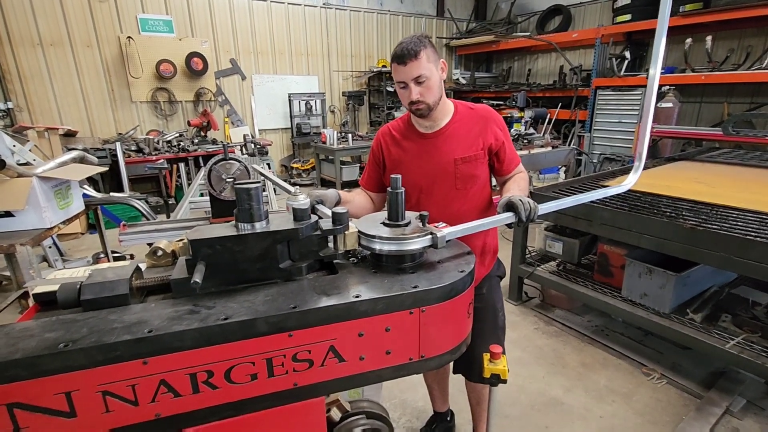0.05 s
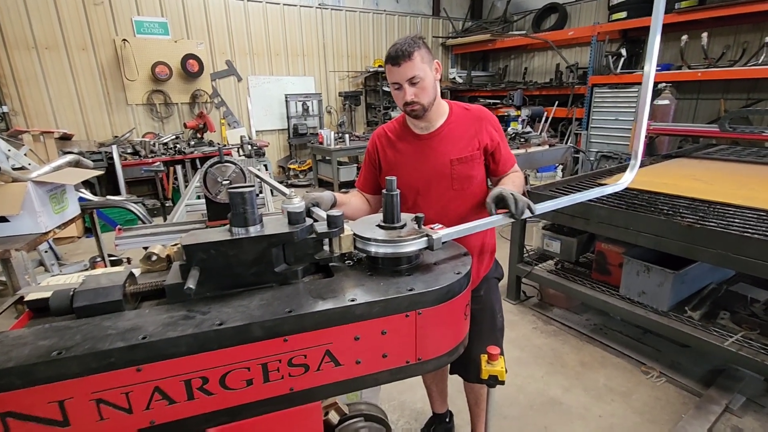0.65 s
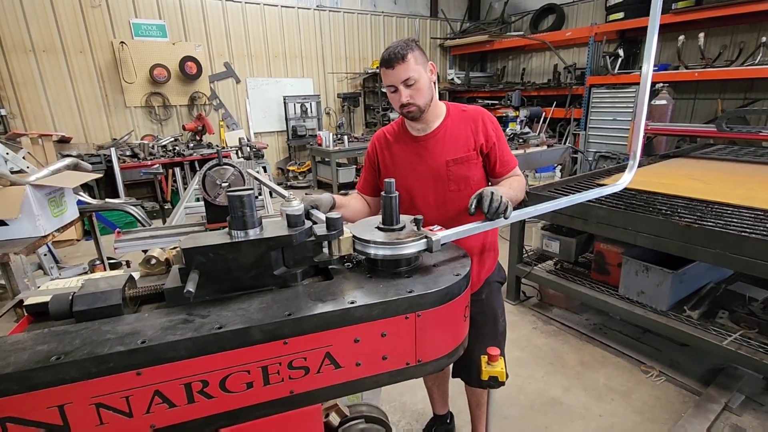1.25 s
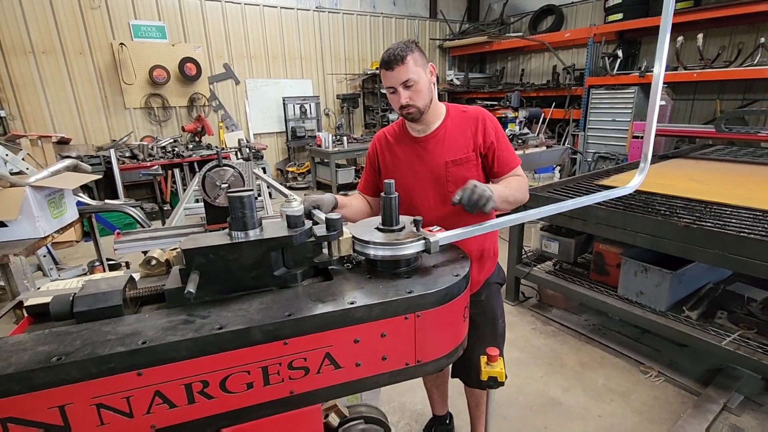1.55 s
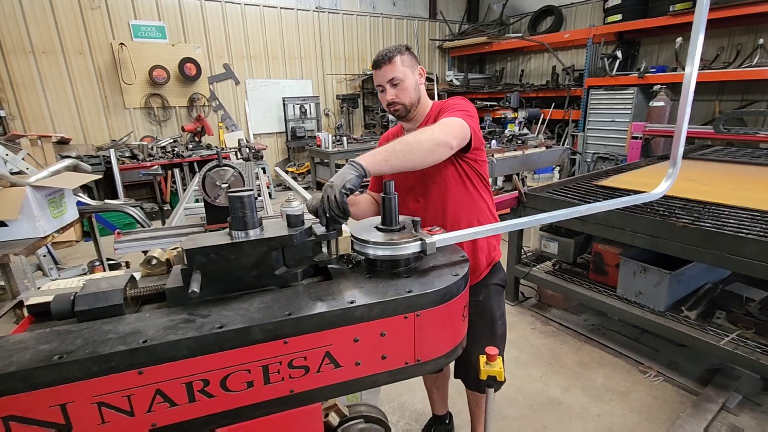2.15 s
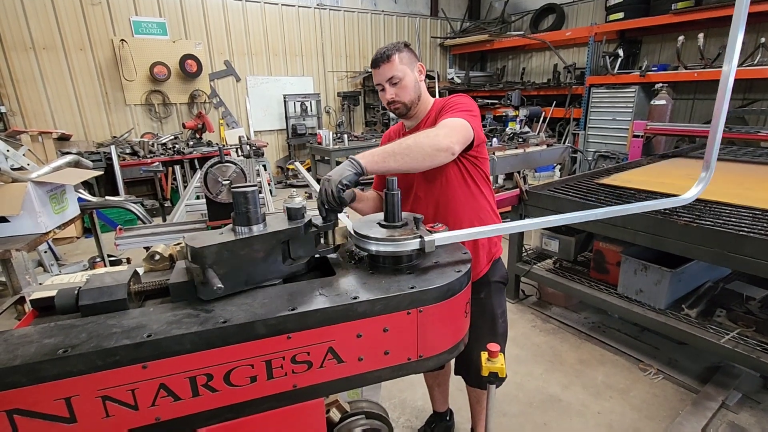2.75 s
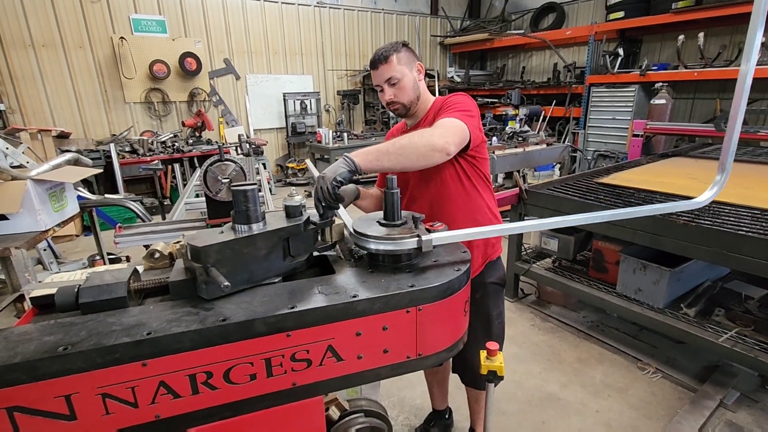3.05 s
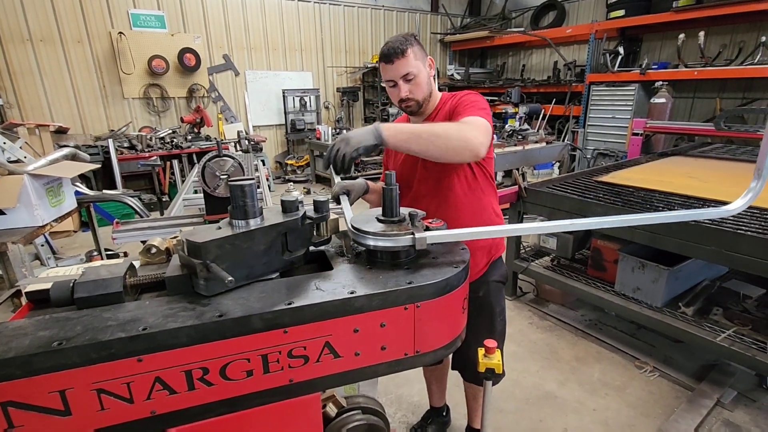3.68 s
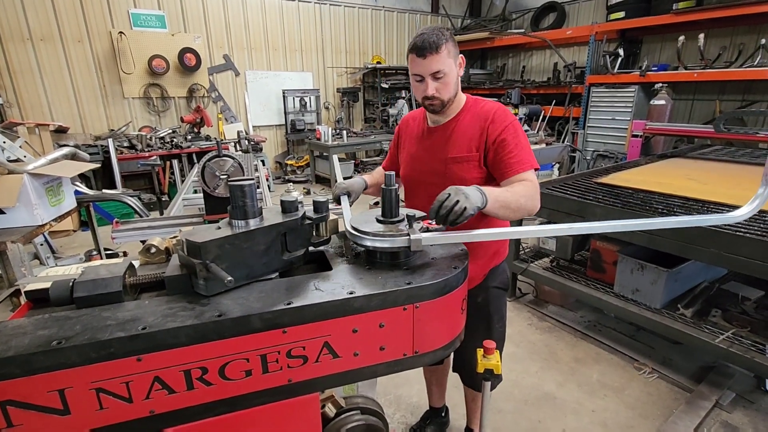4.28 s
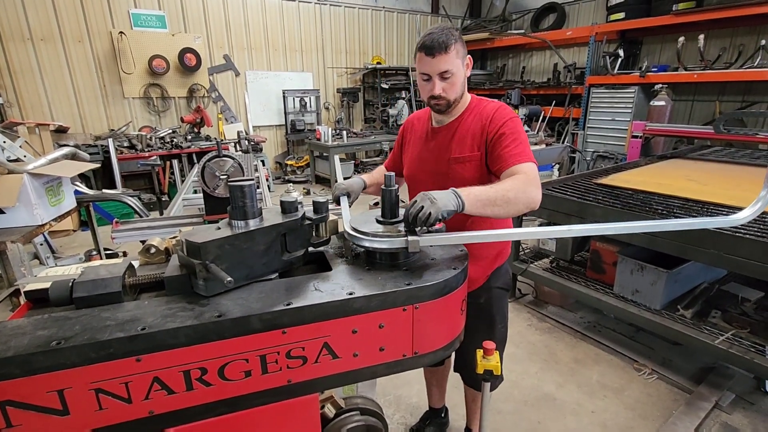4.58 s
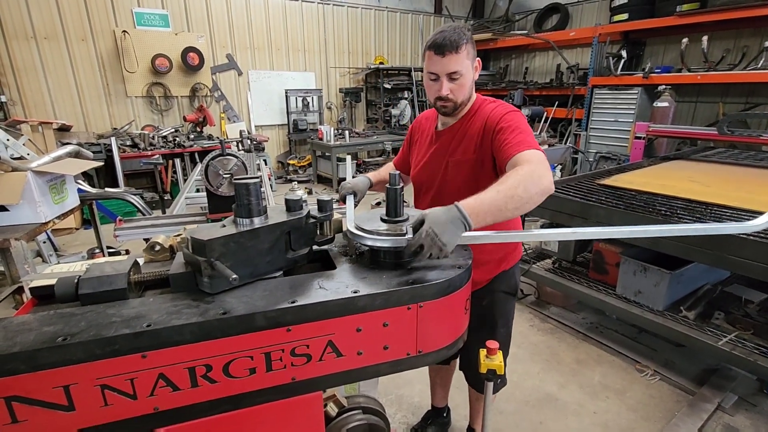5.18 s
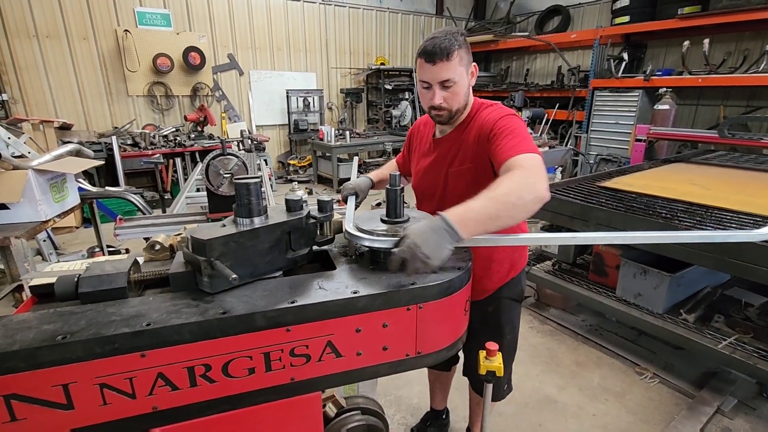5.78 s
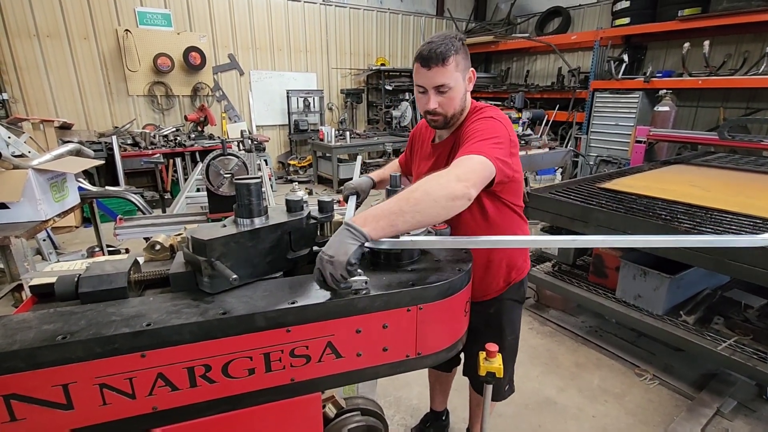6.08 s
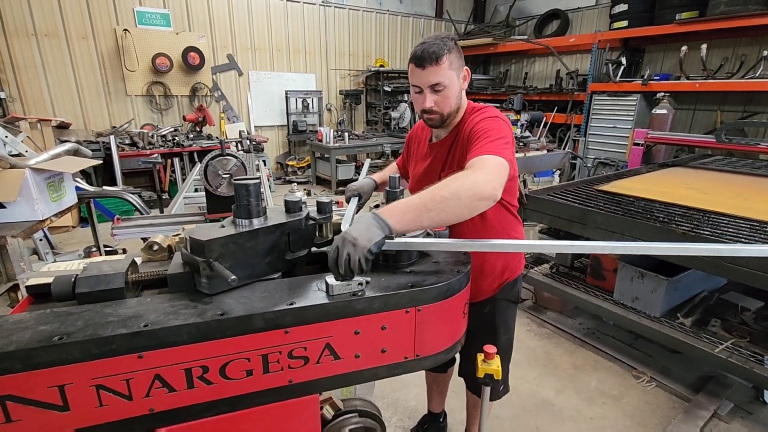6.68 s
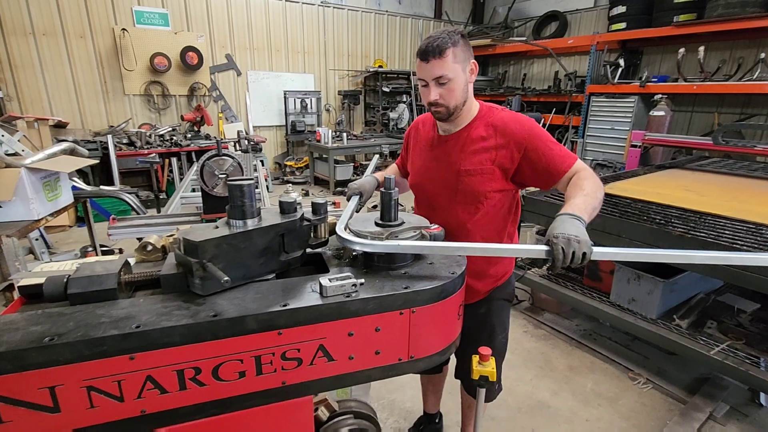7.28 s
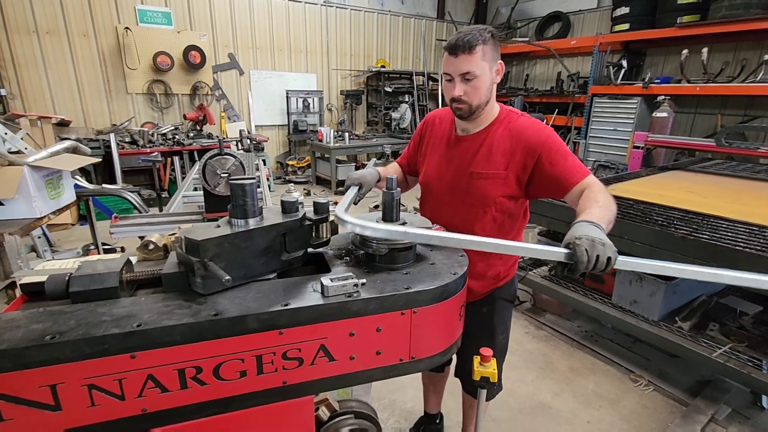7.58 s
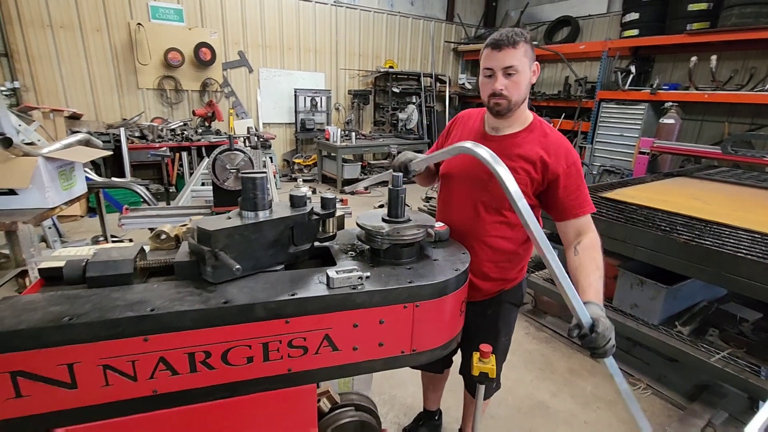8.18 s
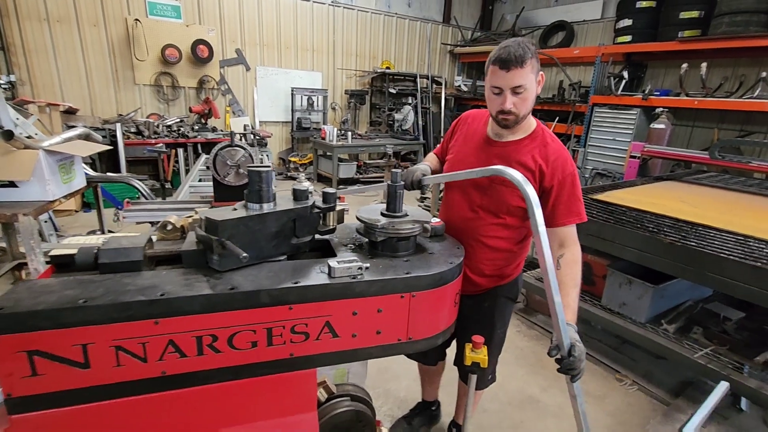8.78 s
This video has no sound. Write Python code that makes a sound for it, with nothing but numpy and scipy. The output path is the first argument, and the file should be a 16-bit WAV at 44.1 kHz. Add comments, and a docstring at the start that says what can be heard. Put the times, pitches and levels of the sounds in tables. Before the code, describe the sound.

A tube bending machine close by gives a brief high whistle and a few dull knocks, pauses, then settles into a lasting electric whine with gear hum and fan rush. Midway come light steel clinks and a short sliding hiss, followed by a loud, bright clank as a block is set on the metal table. A tube snaps loose just after. Ventilation rumbles throughout in the slightly reverberant workshop.

```python
"""An electric tube bender in a workshop, over the rumble of ventilation. First its inverter-fed motor
creeps with a thin magnetic whistle, stops, then runs up to a lasting whine with gear hum and fan rush;
at each start and stop the gears knock in the frame. A glove lets go of a steel clamp block with a faint
tick; then the block clinks on steel, is slid off the tube with a hiss and is set down on the machine's
steel table, where it rings. Last, the tube snaps free and a glove slides along it as the motor runs."""
import sys
import numpy as np
from scipy import signal
from scipy.fft import rfft, irfft, next_fast_len
from scipy.io import wavfile

SR = 44100
rng = np.random.default_rng(int(sys.argv[2]) if len(sys.argv) > 2 else 0)


def transcribe(signal):
    """Save signal, clipped to [-1, 1], as a 16-bit WAV file at the path in sys.argv[1]."""
    frames = np.atleast_2d(signal).T
    limited = np.clip(frames, -1, 1)
    pcm = np.round(limited * 32767).astype(np.int16)
    wavfile.write(sys.argv[1], SR, pcm)


N = 398663
T = np.arange(N) / SR
CARRIER_HZ, SUPPLY_HZ = 3001.2, 70.0  # the inverter's switching; its output at full speed

# noise of ventilation, fan and bearings, knocked frame, fed windings and sliding steel:
# (frequency [Hz], spectral density [dB])
VENTILATION_SPECTRUM = [(20, -73), (38, -55.5), (58, -51), (76, -59), (98, -53.5), (125, -66), (250, -76.5),
                        (450, -74), (850, -71), (1200, -76), (2200, -84), (3500, -94.5), (7500, -97.5),
                        (15000, -112)]
FAN_SPECTRUM = [(200, -81.5), (400, -73.5), (750, -88.5), (1150, -81.5), (1450, -86), (1800, -91),
                (2150, -81.5), (2500, -85.5), (3300, -85.5), (5100, -90), (6300, -85), (8000, -93.5),
                (10000, -100), (11600, -102), (12700, -96), (15000, -99.5)]
FRAME_SPECTRUM = [(150, -68), (250, -67), (350, -53.5), (450, -49), (620, -64.5), (800, -62), (1000, -56),
                  (1300, -73.5), (1600, -60), (1900, -71.5), (2200, -66.5), (3500, -75), (7500, -75),
                  (14000, -99.5)]
SIZZLE_SPECTRUM = [(2000, -40), (4500, -57), (6500, -46), (8500, -60), (10500, -70), (12500, -50),
                   (15000, -63)]
FRICTION_SPECTRUM = [(1000, -81), (2000, -78), (3300, -73), (5000, -77.5), (7200, -69), (10000, -85.5),
                     (13500, -73.5), (15500, -82.6)]
# motor housing resonances: (frequency [Hz], half width [Hz], added peak [dB])
HOUSING_MODES = [(2590, 24, -2), (3420, 35, -2), (4195, 11.5, 3), (4500, 13, 2), (4856, 19, 8),
                 (6440, 27, -1), (7120, 25, 1), (7570, 64, 11.5), (8300, 28, 11)]
# gears take up their play: (time [s], level [dB], tilt [dB/octave])
GEAR_KNOCKS = [(.053, 0, 1), (0.096, -2.5, -8), (.131, 0.5, -1), (.62, 3.5, -6), (.666, -9.5, -9),
               (1.343, 1.5, 0.5), (1.377, 4.5, 0), (1.405, -4.5, 2.5), (1.427, 2, -4), (1.645, -7, -2)]
# gearbox tones at full speed: (frequency [Hz], level [dB], roughness [0-1], left lag [rad])
GEAR_TONES = [(261.2, -63, 0.96, 1), (317.5, -58.5, 0.8, 0.5), (382, -60.5, .5, -2.5), (420, -55, 0.77, 0),
              (451.9, -50, 0.24, 0.43), (481.7, -54, 0.96, 0.05), (974.4, -60.5, 0.1, 2.5),
              (1297, -50, 0.95, 3), (1370, -59, 0.7, 3.5), (1440, -53, 0.84, 2.5)]
# the motor's own hum: (supply multiple, level [dB], left lag [rad])
MOTOR_HARMONICS = [(9, -54.5, 1.27), (10, -45.5, 1.5)]
# clusters of weak sidebands: (carrier multiple, level [dB])
BUZZ_BANDS = [(1, -75), (2, -61), (4, -59.5), (5, -67)]
# current fed to creep, brake and restart:
# (time [s], length [s], level of even carrier multiples [dB], level of odd ones [dB])
CURRENT_FEEDS = [(0.012, 0.063, -38.5, -41), (0.075, 0.356, -37.5, -44), (0.399, 0.058, -39, -62),
                 (1.302, 0.1, -36, -40.5)]
# whistle of a feed:
# (carrier multiple, level [dB], left minus right [dB], roughness [0-1], flutter [1/s], left lag [rad])
WHISTLE_TONES = [(2, 6.5, 6.5, 0.42, 83, 1.63), (3, -1, 4, .9, 120, 0.84), (4, -1.5, -5, 0.6, 130, 1.85),
                 (5, -4, 3, 0.9, 130, 1.2)]
# magnetic tones at full speed: (carrier multiple, supply multiple, level [dB], left minus right [dB])
WHINE_TONES = [(1, -3, -61, 2), (1, -1, -66, 5), (1, 1, -68, 1), (1, 3, -57.5, 3), (1, 5, -66, 8),
               (2, -10, -61.5, 7), (2, -4, -60.5, 4), (2, -2, -55, 7), (2, 0, -64, 4), (2, 2, -55.5, 5),
               (2, 4, -52, 0), (2, 5, -61, 7), (2, 6, -63.5, 9), (2, 8, -47.5, 8), (2, 10, -64.5, 1),
               (2, 18, -67.5, 7), (3, -21, -64, 4), (3, -19, -69, -7), (3, -9, -62, -4), (3, -7, -63.5, 6),
               (3, -3, -69, -1), (4, -6, -71, -1), (4, 0, -66, -11), (4, 6, -69, -12), (4, 8, -70, -13),
               (5, -11, -73, -10)]
# drift of strong whine tones near each named frequency as the worker moves: (time [s], level [dB])
DRIFT_3200 = [(1.5, 0), (2.2, -3), (2.7, -1.5), (4.9, -5), (6.5, -2), (8.1, -1.5), (8.5, 6.5), (8.82, 10.5),
              (9.03, 7.5)]
DRIFT_5800 = [(1.5, -1), (2.6, -6), (3.5, 2), (5, 2.5), (6.8, 2.5), (8.2, 5.5), (9.03, 2)]
DRIFT_6280 = [(1.5, -5), (2, -10), (2.5, -.5), (3.1, -5), (3.5, 1), (4.2, 1), (4.55, -3), (5, 2.5),
              (6.8, -7), (7.3, 0), (7.8, 1), (8.35, -8), (9, 8)]
DRIFT_6560 = [(1.5, -6), (2, -4), (2.9, -3.5), (3.8, -6), (5.5, -4), (6.8, -3.5), (7.7, -5), (8.2, -3),
              (8.55, -10), (8.8, -10), (9.03, 2)]
# the block, then a glove, slides on the tube: (time [s], length [s], level [dB])
SLIDE_STROKES = [(5.546, 0.21, 0.5), (7.43, 0.047, -11.5)]
# the tube snaps free: (time [s], level [dB], t60 [s])
TUBE_SNAPS = [(6.9035, -15, .013), (6.921, -33, .025)]
# dense, short-lived modes of the tube and of the steel table: (frequency [Hz], relative level [dB])
TUBE_SPECTRUM = [(500, -33), (1600, -8), (2300, -4), (3200, 3), (4200, -3), (5500, -11), (10000, -27),
                 (14000, -17), (16000, -25)]
TABLE_SPECTRUM = [(300, -36), (900, -10), (1600, -16), (2600, 2), (3260, 5), (3700, 1), (4220, 9),
                  (4750, -1), (5350, 5), (6300, -3), (7300, -2), (8800, 3), (10400, -11), (12200, -5),
                  (14000, 1), (15000, -3), (16000, -17)]
# modes of the clamp block: (frequency [Hz], level [dB], t60 [s], left minus right [dB],
# left lag [rad], change when struck on an edge [dB])
BLOCK_MODES = [(1784, -26, 1.6, -2, .8, 0), (3870, -8.5, .25, 0, 1.7, -1), (4120, -4.5, .21, -1, 2.3, -7),
               (7752, -18, .36, 3, 2.1, 13), (8834, 0, .21, 4, 1.4, -14), (9195, -15, .17, 3, 1.9, 17),
               (11353, -14, .38, 1, 1.4, 6), (14078, -5, .23, -4, .6, -14)]
# a glove lets go of the block with a faint tick (first row); then the block clinks on steel:
# (time [s], ring level [dB], hardness as tilt [dB/octave], free ringing [s],
# change of lowest bending mode [dB], crack level [dB], crack t60 [s], edge share [0-1])
BLOCK_IMPULSES = [(3.74, -60, -10, .01, -12, -38, .06, 0), (4.775, -35, -11, 0.062, -17, -54, .03, .4),
                  (4.822, -37.5, -16, 0.0095, 2, -44, .05, .4),
                  (4.829, -37, -10, 0.011, -6, -37, 0.048, .5),
                  (4.835, -26, -8.5, 0.017, -22, -32, 0.071, 1), (4.862, -43, -10, .015, -17, -46, .03, .7),
                  (6.139, -17.5, -13.5, 0.158, -6.5, -35, 0.043, 0.7),
                  (6.17, -33.5, -2, 0.054, -3, -33, 0.044, 0.07), (6.295, -12, 0, .5, -22, -11.5, .035, 0),
                  (6.3, -30, 0, .03, -10, -17, .04, 0), (6.305, -32, -4, .03, -10, -24, .15, 0),
                  (6.646, -34, -6.5, 0.025, -10, -55, .02, 0), (6.814, -55, 11, .01, 0, -17, 0.014, 0),
                  (6.856, -31, -13, .04, 4, -34, .03, 0),
                  (6.861, -23, -10.5, 0.0069, -7, -23.5, 0.027, 0.16)]


def undb(db):
    """Amplitude ratio of a level in decibels."""
    return 10 ** (np.asarray(db) / 20)


def panned(db):
    """Constant-power gains for a left minus right level difference."""
    gains = undb(np.array([np.atleast_1d(db), -np.atleast_1d(db)]) / 2)
    return gains / np.sqrt(np.mean(gains ** 2, axis=0))


def path_phase(hz, lag_samples=20):
    """Path difference: sound from the right arrives late on the left, by this phase in radians."""
    return 2 * np.pi * hz * lag_samples / SR


def walk(rate):
    """Band-limited random fluctuation: about rate changes a second, spread near 1."""
    knots = rng.standard_normal(int(N / SR * rate) + 3)
    fine = signal.resample(knots, 8 * len(knots))
    return np.interp(T * rate * 8, np.arange(len(fine)), fine)


def envelope(start, attack, length, t60):
    """Linear rise, held until length has passed, then exponential decay."""
    age = T - start
    return np.clip(age / attack, 0, 1) * undb(-60 * np.clip((age - length) / t60, 0, 3))


def add(out, start, sound):
    """Superposition: a sound joins the mix at its start time."""
    i = int(start * SR)
    out[:, i:i + sound.shape[1]] += sound[:, :N - i]


def noise(spectrum, direct, size=N, tilt_db=0, peaks=()):
    """Direct plus diffuse noise field; long waves are coherent between left and right."""
    n = next_fast_len(size, True)
    hz = np.maximum(np.arange(n // 2 + 1) * SR / n, 1)
    source, mid, side = rfft(rng.standard_normal((3, n)))
    coherence = .99 / (1 + (hz / 640) ** 4)
    direct = direct * (1 - coherence)
    near = source * np.array([np.exp(-1j * path_phase(hz)), np.ones(len(hz))])
    diffuse = mid * np.sqrt((1 + coherence) / 2) + side * np.sqrt((1 - coherence) / 2) * [[1], [-1]]
    field = np.sqrt(direct) * near + np.sqrt(1 - direct) * diffuse
    knot_hz, knot_db = np.transpose(spectrum)
    gain = undb(np.interp(np.log(hz), np.log(knot_hz), knot_db))
    gain *= undb(tilt_db * np.log2(np.maximum(hz, 200) / 450))
    gain *= hz ** 2 / (hz ** 2 + 150)  # rolls off below about 12 Hz
    gain *= 1 + sum(undb(db) / (1 + ((hz - centre) / width) ** 2) for centre, width, db in peaks)
    return irfft(field * gain, n)[:, :size] * np.sqrt(SR / 2)


def tone(turns, rough, rate, lag, drift_db=0):
    """Random modulation: a steady sinusoid plus a rough share of narrow-band noise, rms near 1."""
    angle = 2 * np.pi * (turns % 1 + rng.random())
    amplitude = np.sqrt(2 * (1 - rough ** 2)) + rough * (walk(rate) + 1j * walk(rate))
    phasor = amplitude * np.exp(1j * angle)
    pair = np.array([(phasor * np.exp(-1j * lag)).real, phasor.real])
    return pair * undb(drift_db * np.array([walk(1.775), walk(2.03)])) if drift_db else pair


def room(dry, wet_db, low_t60=.39, treble_t60=.43):
    """Reverberation: the workshop's reflections add a diffuse, exponentially decaying tail."""
    t = T[:SR]
    hiss = rng.standard_normal((2, SR))
    low = signal.sosfilt(signal.butter(2, 2500, fs=SR, output="sos"), hiss)
    tail = (low * undb(-60 * t / low_t60) + (hiss - low) * undb(-60 * t / treble_t60)) * (t > .005)
    tail /= np.sqrt(np.sum(tail ** 2, axis=1, keepdims=True))
    return dry + undb(wet_db) * signal.fftconvolve(dry, tail, axes=1)[:, :N]


def ventilation():
    """Broadband flow noise, strongest in the bass, rumbles and swells slightly."""
    swell = undb(.7 * walk(5))
    return noise(VENTILATION_SPECTRUM, direct=.43) * swell * panned(1)


def fan(speed):
    """Resonance: the rush of fan and bearings excites narrow modes of the motor housing."""
    rush = noise(FAN_SPECTRUM, direct=.082, peaks=HOUSING_MODES)
    return rush * undb(.5 * walk(2.79)) * panned(2.1) * speed


def gear_knocks(rise_s=.0047, t60=.16):
    """Backlash: gear teeth meet and rattle the heavy frame in short, dull bursts."""
    out, t = np.zeros((2, N)), T[:SR // 2]
    burst = np.minimum(t / rise_s, 1) * undb(-60 * t / t60)
    for start, db, tilt_db in GEAR_KNOCKS:
        rattle = noise(FRAME_SPECTRUM, direct=.42, size=len(t), tilt_db=tilt_db)
        add(out, start, rattle * undb(db) * burst)
    return room(out * panned(2.9), wet_db=-1.5)


def loosening(length):
    """Envelope of the hum's change of timbre as the clamp is loosened."""
    return envelope(2.32, attack=.57, length=length, t60=8.6)


def gear_hum(speed, run_s, rasp_hz=2116, shaft_hz=32.2):
    """Modulation: mesh tones flutter with the load, and a rasp once a shaft turn makes sidebands."""
    upper_lift_db = 7.5 * loosening(length=.43)
    out = 0
    for hz, db, rough, lag in GEAR_TONES:
        gain = undb(db + .5 + (upper_lift_db if hz > 1100 else 0))
        out += gain * tone(hz * run_s, rough, rate=hz / 32, lag=lag)
    for k in range(-2, 3):
        rasp = tone((rasp_hz + k * shaft_hz) * run_s, rough=.69, rate=9, lag=1.5)
        out += undb(-59.5 - 3.5 * abs(k)) * rasp
    return out * speed * panned(1.5)


def motor_hum(speed, run_s, growth_db_per_s=.1):
    """Forced vibration at supply harmonics grows slowly and sinks for a while as the clamp loosens."""
    hum = sum(undb(db) * tone(round(k) * SUPPLY_HZ * run_s, rough=.18, rate=13, lag=lag)
              for k, db, lag in MOTOR_HARMONICS)
    level_db = 1.5 + growth_db_per_s * run_s - 4 * loosening(length=2)
    return hum * speed * undb(level_db) * panned(-.67)


def inverter_buzz(speed, run_s, sidebands=21, size=1024):
    """Periodic modulation: a pattern repeats each supply cycle, so weak sidebands flank the carriers."""
    out, orders = np.zeros((2, N)), np.arange(-sidebands, sidebands + 1)
    place = (SUPPLY_HZ * run_s % 1 * size).astype(int)
    harmonics = np.exp(2j * np.pi * np.outer(orders, np.arange(size)) / size)
    for multiple, db in BUZZ_BANDS:
        # odd carrier multiples carry mostly odd sidebands, even ones even
        parity = np.where((orders + round(multiple)) % 2, .35, 1)
        weight = parity * (rng.standard_normal((2, len(orders), 2)) @ [1, 1j])
        cycle = (weight / (1 + (orders / 11) ** 2)) @ harmonics  # the outer ones are weaker
        carrier = np.exp(2j * np.pi * round(multiple) * CARRIER_HZ * T)
        out += undb(db) * (cycle[:, place] / cycle.real.std() * carrier).real
    return out * speed ** 2


def creep_whistle(attack_s=.05, t60=.11, odd_delay_s=.02, sag_db_per_s=26):
    """Beating: at a crawl, sidebands crowd the carrier multiples; the current sags after each surge."""
    even, odd, whistle = 0, 0, 0
    for start, length, even_db, odd_db in CURRENT_FEEDS:
        sag_db = -sag_db_per_s * np.clip(T - start, 0, length)
        even += envelope(start, attack_s, length, t60) * undb(even_db + sag_db)
        odd += envelope(start + odd_delay_s, attack_s, length - odd_delay_s, t60) * undb(odd_db + sag_db)
    for multiple, db, pan_db, rough, rate, lag in WHISTLE_TONES:
        feed = odd if round(multiple) % 2 else even
        partial = tone(round(multiple) * CARRIER_HZ * T, rough, rate, lag)
        whistle += feed * undb(db) * panned(pan_db) * partial
    sizzle = noise(SIZZLE_SPECTRUM, direct=.18) * even
    return room(whistle + sizzle, wet_db=-8.5)


def creep_whirr(hz=812):
    """Narrow-band noise: the gears whirr softly while the shaft crawls."""
    crawl = envelope(.055, attack=.073, length=.61, t60=.99)
    return undb(-44.5) * crawl * tone(hz * T, rough=1, rate=51, lag=1.94)


def motor_whine(speed, run_s, throb_hz=5.2):
    """Magnetic forces shake the stator at carrier multiples plus and minus multiples of the supply."""
    throb_db = 2 * np.sin(2 * np.pi * throb_hz * run_s)  # rotor slip modulates the inner sidebands
    # standing waves shift as the worker moves
    low, under, middle, top = (np.interp(T, *np.transpose(curve))
                               for curve in (DRIFT_3200, DRIFT_5800, DRIFT_6280, DRIFT_6560))
    drift_db = {(1, 3): low, (2, -4): under, (2, -2): under + throb_db,
                (2, 2): top + throb_db, (2, 4): middle, (2, 8): top}
    out = np.zeros((2, N))
    for carrier, supply, db, pan_db in WHINE_TONES:
        carrier, supply = round(carrier), round(supply)
        turns = carrier * CARRIER_HZ * T + supply * SUPPLY_HZ * run_s
        lag = path_phase(carrier * CARRIER_HZ + supply * SUPPLY_HZ) if carrier > 1 else 2.0
        rough = .2 if (carrier, supply) in drift_db else .33  # the weak tones waver most
        sideband = tone(turns, rough, rate=11, lag=lag, drift_db=.49)
        out += sideband * undb(db + drift_db.get((carrier, supply), 0)) * panned(pan_db)
    return out * speed ** 2


def sliding():
    """Friction: rubbing on the tube makes a grainy hiss that grows as each stroke gathers speed."""
    strokes = sum(undb(db) * envelope(start, length, length, t60=.29)
                  for start, length, db in SLIDE_STROKES)
    return noise(FRICTION_SPECTRUM, direct=.13) * strokes * undb(1.8 * walk(160))


def tube_snaps():
    """Impulsive excitation: the tube snaps out of the forming die with quickly damped clacks."""
    out, t = np.zeros((2, N)), T[:SR // 8]
    for start, db, t60 in TUBE_SNAPS:
        clack = noise(TUBE_SPECTRUM, direct=.49, size=len(t))
        add(out, start, clack / clack.std() * undb(db - 60 * t / t60))
    return room(out, wet_db=-9)


def block_ring(t, tilt_db, free_s, bend_db, edge, twin_db=-19, twin_split=.005):
    """Modal vibration: each mode of the block beats with a faint, slightly higher, longer-lived twin."""
    ring, knots = 0, np.linspace(0, t[-1], 90)
    detune = .006 * np.exp(-free_s / .06)  # a firm grip pulls the modes off pitch
    for k, (hz, db, t60, pan_db, lag, edge_db) in enumerate(BLOCK_MODES):
        db += edge_db * edge + tilt_db * np.log2(hz / 4000)  # hard contacts are brighter
        db += bend_db * (k == 0)  # lying flat, the block can hardly bend
        chatter_db = 1.7 * np.interp(t, knots, rng.standard_normal(len(knots)))
        beat = np.exp(2j * np.pi * (twin_split * hz * t + rng.random()))
        twin = undb(twin_db - 60 * t / (3.2 * t60)) * beat
        phasor = np.exp(2j * np.pi * hz * (1 + detune * rng.standard_normal()) * t)
        mode = undb(db + chatter_db) * (undb(-60 * t / t60) + twin) * phasor
        ring += panned(pan_db) * np.array([mode * np.exp(-1j * lag), mode]).imag
    return np.sqrt(2) * ring


def clamp_block(onset_s=.00093, damping_s=.022):
    """Impulse response: the block ticks as a glove lets go, then cracks and rings on steel till damped."""
    out, t = np.zeros((2, N)), T[:SR * 3 // 4]
    for start, ring_db, tilt_db, free_s, bend_db, crack_db, crack_t60, edge in BLOCK_IMPULSES:
        onset = np.minimum(t / onset_s, 1)
        damping = np.exp(-np.maximum(t - free_s, 0) / damping_s)  # by the glove or the table
        ring = block_ring(t, tilt_db, free_s, bend_db, edge) * undb(ring_db) * onset * damping
        crack = noise(TABLE_SPECTRUM, direct=.11, size=len(t), tilt_db=.72 * tilt_db)
        crack *= undb(crack_db - 60 * t / crack_t60) / crack.std()
        add(out, start, ring + crack)
    return room(out, wet_db=-8.5)


def scene(run_up_at_s=1.33, run_up_s=.12):
    """Superposition of machine, workshop and handling; the motor runs up evenly to full speed."""
    speed = np.clip((T - run_up_at_s) / run_up_s, 0, 1)
    run_s = np.cumsum(speed) / SR  # the shaft's travel, in seconds at full speed
    drive = creep_whistle() + creep_whirr() + motor_whine(speed, run_s) + inverter_buzz(speed, run_s)
    hum = gear_hum(speed, run_s) + motor_hum(speed, run_s)
    air = ventilation() + fan(speed)
    return drive + hum + air + gear_knocks() + clamp_block() + tube_snaps() + sliding()


def record(dry, top_hz=15550):
    """Clipping at full scale, then a steep low-pass filter."""
    return signal.sosfilt(signal.ellip(10, .2, 80, top_hz, fs=SR, output="sos"), np.clip(dry, -1, 1))


dry = scene()
out = record(dry)
transcribe(out)
```